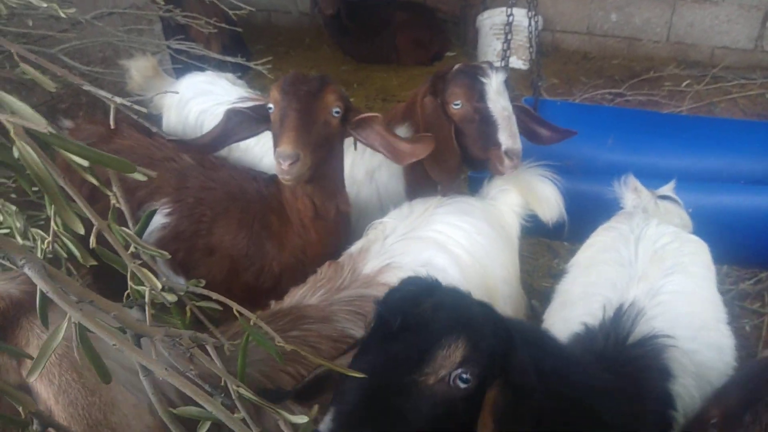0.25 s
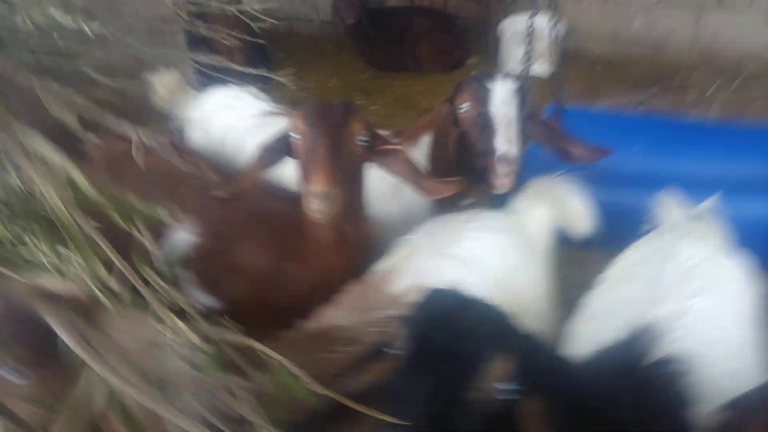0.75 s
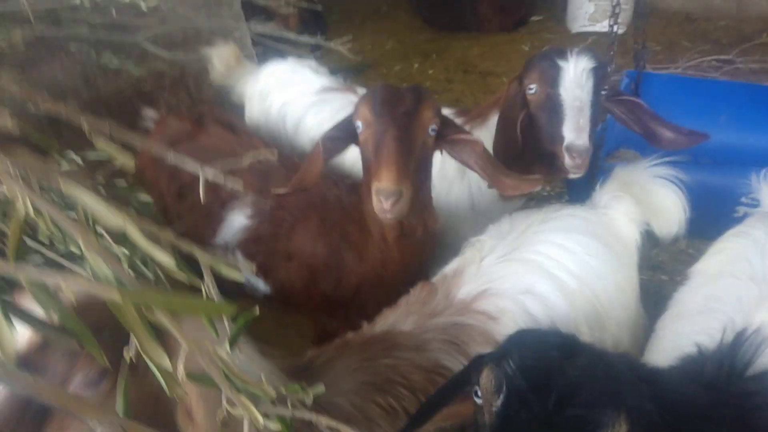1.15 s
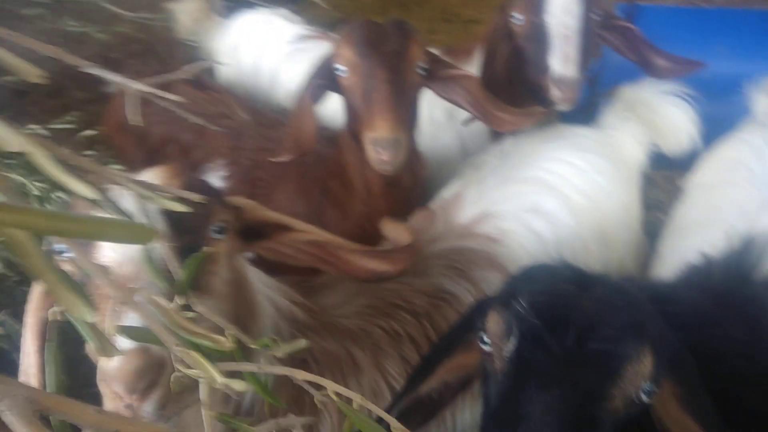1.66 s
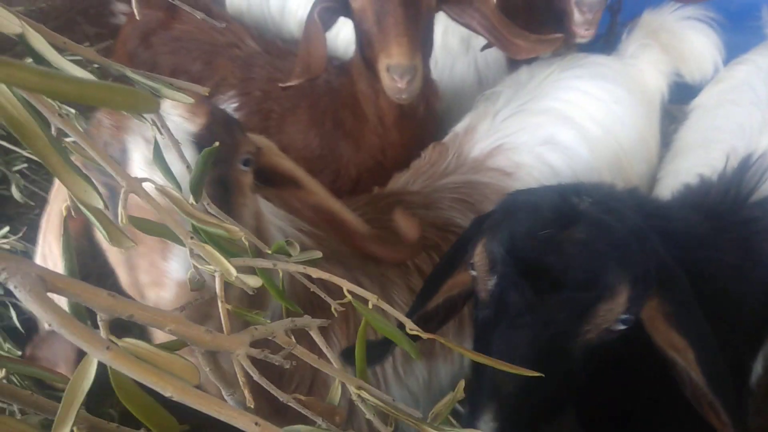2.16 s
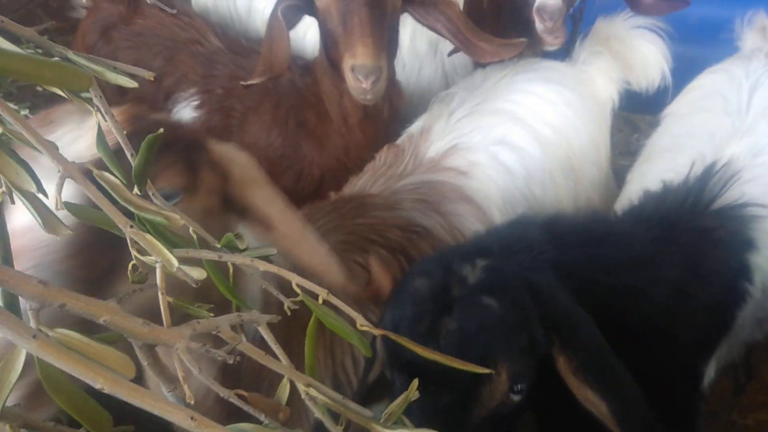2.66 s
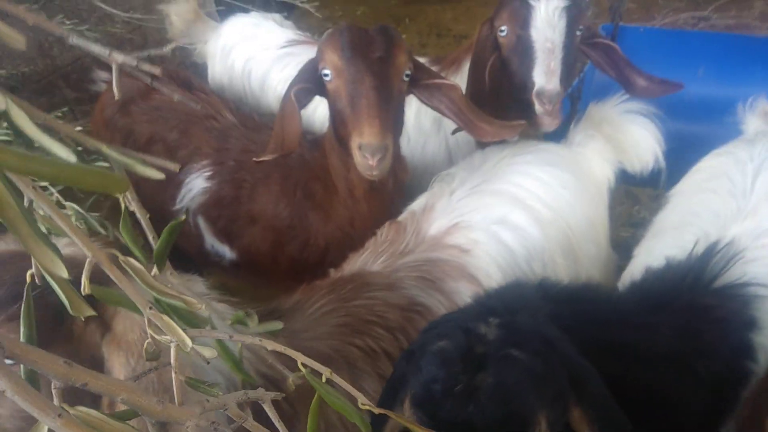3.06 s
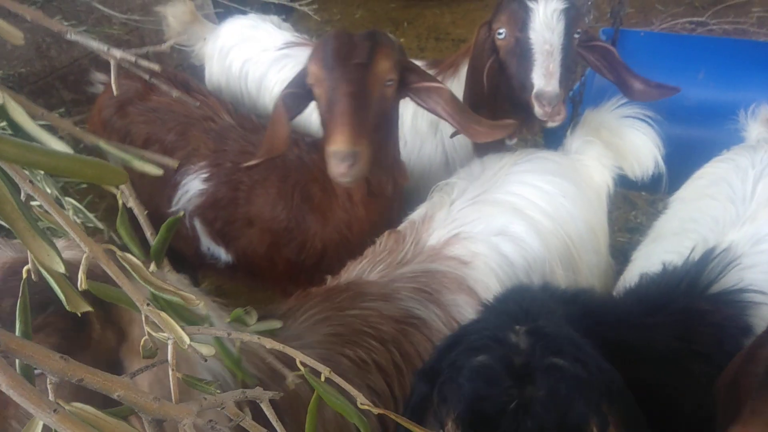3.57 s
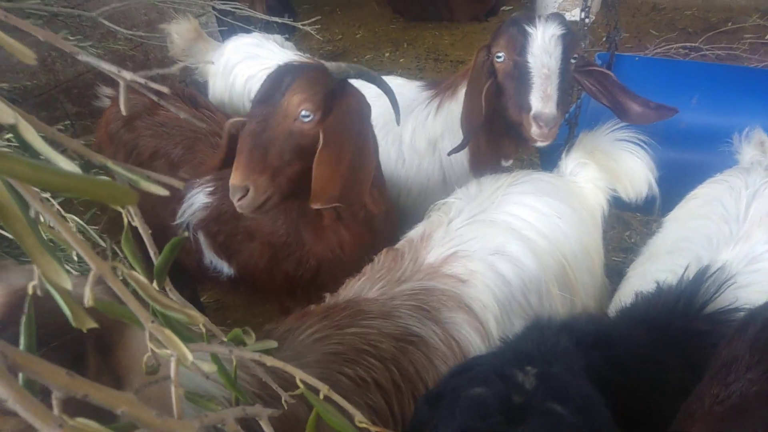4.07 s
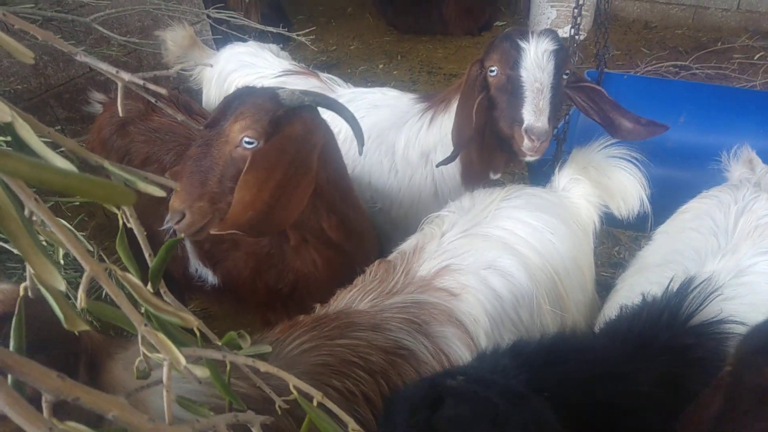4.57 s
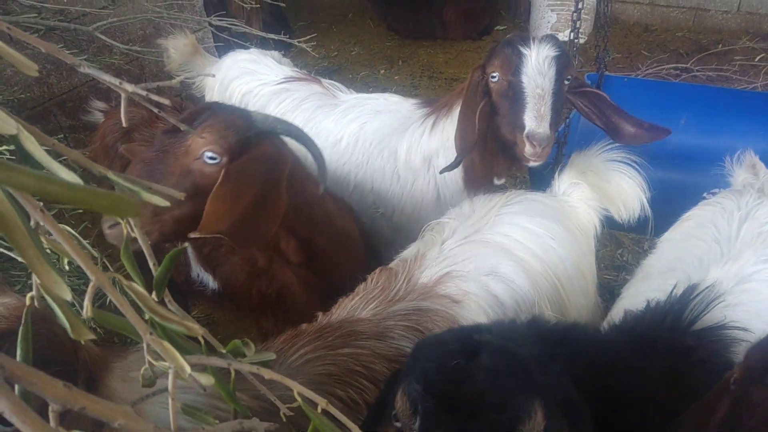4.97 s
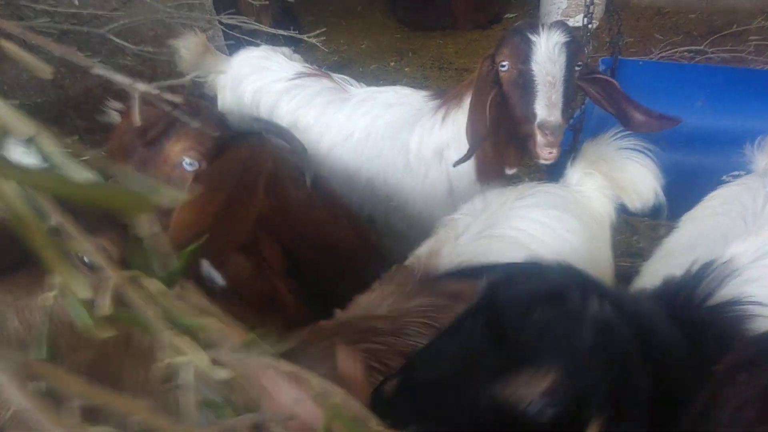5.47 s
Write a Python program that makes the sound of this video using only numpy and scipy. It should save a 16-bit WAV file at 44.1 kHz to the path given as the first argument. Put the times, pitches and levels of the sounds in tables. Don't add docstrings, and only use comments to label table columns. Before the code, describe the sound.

Goats browse on leafy branches right beside a hand-held phone in an open pen; the sound is dry, close and bright over very faint hiss and soft handling rumble. Small wooden knocks at 0.2 s lead into sharp twig clicks and a tiny squeak at 0.3-0.5 s, then leaves drag and snap at 0.7-0.95 s. Isolated snaps with short leaf showers follow at 1.4, 1.5 and 1.75 s. From 2.2 to 2.4 s jaws grind dully with low thuds; a firmer bite cracks at 2.8 s. Sparse tugs continue at 3.0, 3.4 and 3.8 s, and a heavy low thud and grind falls at 4.0 s. Snaps resume at 4.2 s, a strong one at 4.57 s, then dense rustling to 4.9 s. From 5.06 s breaks quicken, a stalk squeaks, and the loudest crunching cracks burst at 5.3-5.45 s, rustle fading by 5.7 s. Leaf treble leans left.

```python
import sys
import numpy as np
from scipy import signal
from scipy.fft import rfft, irfft
from scipy.io import wavfile
from scipy.ndimage import uniform_filter1d

SR = 44100
rng = np.random.default_rng(int(sys.argv[2]) if len(sys.argv) > 2 else 0)


def bounce(signal):
    frames = np.transpose(np.atleast_2d(signal))
    limited = np.clip(frames, -1, 1)
    pcm = np.round(limited * 32767).astype(np.int16)
    wavfile.write(sys.argv[1], SR, pcm)


def voltage_ratio(decibels):
    exponent = np.asarray(decibels, float) / 20
    return 10 ** exponent


N = 253134
TIME = np.arange(N) / SR
FREQ = np.fft.rfftfreq(N, 1 / SR)
PORT_LAG = -17

EDGES_HZ = (2720, 4900, 7700, 9700, 12100, 15850)
# t/s, treble loss/dB
SHADOW = [(0, 13.5), (1.1, 47), (1.5, 32), (4.3, 30), (4.42, 11.5), (4.8, 19.5), (5.2, 13.5), (5.74, 16)]


def band(x, lo_hz, hi_hz, order=200):
    f = np.clip(FREQ, lo_hz / 8, hi_hz * 8)
    low_cut = 1 + (lo_hz / f) ** order
    high_cut = 1 + (f / hi_hz) ** order
    return irfft(rfft(x) / np.sqrt(low_cut * high_cut), N)


def unit(x):
    return x / np.sqrt(np.mean(x ** 2))


def walk(rate_hz):
    k = int(SR / rate_hz)
    steps = np.repeat(rng.standard_normal(N // k + 1), k)
    return 1.2 * uniform_filter1d(uniform_filter1d(steps, k), k)[:N]


def crackle(rate_hz, spread_db, tail_s, bed):
    size_db = spread_db * np.minimum(rng.exponential(size=N), 4)
    breaks = (rng.random(N) < rate_hz / SR) * voltage_ratio(2 * size_db)
    power = signal.lfilter([1], [1, -np.exp(-1 / (tail_s * SR))], breaks)
    return unit(rng.standard_normal(N) * np.sqrt(bed + power / power.mean()))


def ports(x, other, pan_db, alike, lag):
    alike = np.clip(alike, 0, 1)
    right = np.sqrt(1 - alike ** 2) * other - alike * np.roll(x, lag)
    return np.array([x * voltage_ratio(pan_db / 2), right * voltage_ratio(-pan_db / 2)])


def swells(s, length, db, rise_s, fade_db=0):
    t = np.arange(0, N / SR, .001)[:, None] - s
    length = np.maximum(length, .01)
    rise = 20 * np.maximum(-t, 0) / rise_s
    sag = (15 + fade_db) * np.maximum(t, 0) / length
    release = 20 * np.maximum(t - length, 0) / 0.04
    return voltage_ratio(2 * (db - rise - release - sag))


def total(power, rest_db):
    level = 10 * np.log10(power.sum(axis=1) + voltage_ratio(2 * rest_db))
    return np.interp(TIME * 1000, np.arange(len(power)), level)


def floor():
    # f/Hz, density/dB
    hiss = [(18, 5), (35, -8), (75, 10.5), (210, -11), (584, -1.5), (780, -13.5), (2900, -6.5),
            (15500, -10)]
    hz, db = np.transpose(hiss)
    shape = voltage_ratio(np.interp(np.log(FREQ + 1), np.log(hz), db)) * (FREQ < EDGES_HZ[-1])
    a, b = rfft(rng.standard_normal((2, N))) * shape
    alike = np.clip(0.7 / (1 + (FREQ / 900) ** 2), 0, 1)
    pair = irfft(np.array([a, np.sqrt(1 - alike ** 2) * b - alike * a]), N)
    return unit(pair) * voltage_ratio(-67.5 + walk(6.3))


def hand():
    # t/s, length/s, rumble level/dB
    lurches = [(0.06, 0.08, -69), (0.35, 0.096, -71), (0.527, 0.099, -62.5), (0.905, 0.13, -65.5),
               (0.981, 0.1, -62.5), (1.212, 0.081, -67.5), (1.561, 0.17, -63), (1.677, 0.092, -60.5),
               (1.97, 0.074, -63.5), (2.216, 0.075, -65), (2.309, 0.056, -61), (2.724, 0.19, -69.5),
               (2.821, 0.082, -57.5), (3.016, 0.17, -71), (3.21, 0.17, -64), (3.623, 0.13, -71),
               (4.008, 0.14, -55), (4.19, 0.13, -64.5), (4.619, 0.045, -58.5), (4.671, 0.027, -59.5),
               (4.923, 0.21, -72.5), (5.15, 0.054, -59.5), (5.535, 0.29, -75.5)]
    s, length, db = np.transpose(lurches)
    level = total(swells(s, length, db, rise_s=0.62 * length), rest_db=-83)
    one, two = (unit(band(rng.standard_normal(N), 42, 125, order=8)) for _ in range(2))
    return ports(one, two, 1.2, alike=.62, lag=12) * voltage_ratio(level + 5.0 + 2.5 * walk(18))


def knocks():
    # t/s, peak level/dB, f/Hz
    thuds = [(0.151, -73.5, 380), (0.182, -56.5, 505), (0.223, -54.5, 505), (0.236, -59.5, 291),
             (0.608, -52.5, 306), (0.878, -62, 250), (0.976, -57, 206), (1.167, -56, 458.4),
             (1.211, -61, 194), (1.598, -53, 794), (1.609, -54, 383), (1.621, -58.5, 910),
             (2.028, -58.5, 184), (2.103, -58.5, 244), (2.218, -51, 437), (2.256, -60, 431),
             (2.262, -45, 399), (2.292, -51, 258), (2.305, -62, 197.9), (2.343, -58, 570.6),
             (2.663, -66, 557.4), (2.404, -60, 361.4), (2.821, -45.5, 395), (3.228, -49.5, 475),
             (3.661, -45.5, 1731), (3.702, -56.5, 568), (3.987, -45, 163.6), (4.004, -50, 160),
             (4.024, -42.5, 477.4), (4.031, -49, 252.5), (4.352, -55.5, 480), (4.829, -59, 304.1),
             (4.899, -56, 240.6), (5.019, -56.5, 214.4), (5.138, -57, 162)]
    out, t = np.zeros(N + 4096), np.arange(4096) / SR
    for s, db, hz in thuds:
        attack = 1 - np.exp(-t / 0.00034)
        decay = np.exp(-t * hz / 5.3) * attack * (1 - t / t[-1])
        tone = np.sin(2 * np.pi * hz * t) + 0.36 * np.sin(2 * np.pi * 0.453 * hz * t)
        i = int(s * SR)
        out[i:i + 4096] += voltage_ratio(db + 9.5) * decay * tone
    return ports(out[:N], 0, 4.5, alike=.95, lag=5)


def jaws():
    # t/s, length/s, grind level/dB, mouth resonance f/Hz, crunch relative level/dB
    chews = [(.16, 0.11, -67, 540, -3.5), (0.249, 0.032, -64, 303.4, -12), (0.396, 0.13, -72.5, 340, 4),
             (0.61, 0.11, -69, 305, -7), (0.88, 0.14, -72, 299, 6), (0.977, 0.077, -64, 274.5, 0),
             (1.186, 0.11, -66.5, 355.7, -11), (1.602, 0.064, -62, 437, 0.5),
             (2.013, 0.084, -63.5, 315.1, -6), (2.226, 0.14, -60, 483.5, -35),
             (2.286, 0.13, -62, 299.4, -37), (2.35, 0.11, -62, 433, -18), (2.822, 0.04, -57, 362.6, 6),
             (3.215, 0.082, -61, 342.7, -7), (3.363, 0.087, -72.5, 486, -21),
             (3.637, 0.11, -67.5, 380, -2.5), (3.719, 0.035, -70.5, 596.6, 2),
             (3.899, .05, -70.5, 379, -12), (3.955, 0.12, -57, 424, -11), (4.008, 0.11, -57.5, 518, -27),
             (4.36, 0.054, -71.5, 528, -26), (4.917, 0.17, -72, 240, -2), (5.048, 0.086, -70.5, 226.8, -15),
             (5.159, .1, -73, 206, -4), (5.307, 0.093, -62, 323.6, -10), (5.398, 0.11, -67, 604, 25.5)]
    # t/s, length/s, crunch level/dB
    crunches = [(0.773, 0.31, -66.5), (1.411, 0.034, -65.5), (2.403, 0.023, -57.5), (2.426, 0.062, -69.5),
                (2.645, 0.048, -87), (0.54, .08, -69.5), (3.518, 0.049, -80), (3.956, 0.14, -59.5),
                (4.016, 0.047, -60), (4.211, 0.21, -68), (4.535, 0.99, -73), (4.803, 0.069, -57.5),
                (5.137, 0.37, -67.5), (5.31, 0.22, -52.5), (5.365, 0.28, -57.5), (5.459, 0.06, -43)]
    rise, rest_db, rest_hz = 0.2, -82, 280.2

    s, length, db, hz, crunch = np.transpose(chews)
    strokes = swells(s, length, db, rise * length)
    grind = total(strokes, rest_db)
    hz = rest_hz * voltage_ratio(2 * (total(strokes * hz / rest_hz, rest_db) - grind))

    at, lasts, crush = np.transpose(crunches)
    crushes = swells(at, lasts, crush, rise * lasts)
    crunch = total(np.hstack([strokes * voltage_ratio(2 * crunch), crushes]), rest_db=-78)

    body, grit = [], []
    for _ in range(2):
        slips = crackle(80, spread_db=3.0, tail_s=0.0065, bed=0.18)
        ring = unit(band(slips, 0.057, 92, order=4)) * np.sin(2 * np.pi * np.cumsum(hz) / SR)
        body.append(unit(ring) + 1.1 * unit(band(slips, 130, 740, order=10)))
        crumbs = crackle(400, spread_db=3.5, tail_s=0.0031, bed=0.26)
        grit.append(unit(band(crumbs, 670, 2670, order=10)))
    grinding = ports(*body, 4.64, alike=0.68, lag=8) * voltage_ratio(grind + 5.5)
    crunching = ports(*grit, 0.65, alike=0.32, lag=PORT_LAG) * voltage_ratio(crunch + 3.0)
    return grinding + crunching


def bites():
    # t/s, peak level/dB, f/Hz
    cracks = [(0.343, -54.5, 660), (0.427, -58, 750), (2.403, -52, 1064), (2.642, -55.5, 2270),
              (2.824, -37.5, 1100), (2.839, -39, 787.5), (3.592, -57.5, 2040), (3.674, -56, 1820),
              (4.569, -50, 1880), (4.806, -55, 1256), (4.899, -52.5, 1116), (5.082, -54, 2046),
              (5.14, -47, 2090), (5.291, -44.5, 1930), (5.298, -42, 1823), (5.333, -32, 1076),
              (5.374, -26.5, 1630), (5.399, -46, 1864), (5.408, -55, 1530), (5.433, -29, 1636),
              (5.444, -48, 1193), (5.458, -55, 1130), (5.56, -44.5, 2040)]
    decay_s, width = 0.0098, 0.63
    out, t = np.zeros((2, N + 2048)), np.arange(2048) / SR
    f = np.fft.rfftfreq(2048, 1 / SR) + 1
    for (s, db, hz), noise in zip(cracks, rng.standard_normal((len(cracks), 2, 2048))):
        colour = (f > 420) * (f < 2350) / (1 + ((f / hz - hz / f) / width) ** 2)
        burst = np.roll(noise * np.exp(-t / decay_s), 64, axis=1)
        puff = irfft(rfft(burst) * colour, 2048)
        i = int(s * SR) - 64
        out[:, i:i + 2048] += puff / np.abs(puff[0]).max() * voltage_ratio(db - 0.5)
    return ports(*out[:, :N], 0.11, alike=0.17, lag=PORT_LAG)


def scrapes():
    # t/s, length/s, start f/Hz, end f/Hz, level/dB
    squeaks = [
        (0.384, 0.016, 3040, 2890, -41.5),
        (0.392, 0.035, 3200, 2890, -56),
        (5.106, 0.0419, 3450, 3780, -53),
        (5.148, 0.039, 3740, 3270, -47),
    ]
    out = np.zeros(N)
    rough = unit(band(rng.standard_normal(N), 10.0, 190, order=4))
    for s, length, hz0, hz1, db in squeaks:
        u = np.clip((TIME - s) / length, 0, 1)
        phase = 2 * np.pi * np.cumsum(hz0 + (hz1 - hz0) * u) / SR
        out += voltage_ratio(db) * np.sin(np.pi * u) * rough * np.sin(phase)
    return ports(out, 0, 0, alike=0.72, lag=PORT_LAG)


def snaps():
    # t/s, peak level/dB, f/Hz, top band relative level/dB
    twigs = [(0.327, -34.5, 8900, -4), (0.3398, -23.5, 7760, 3.5), (0.353, -45, 6100, -15),
             (0.373, -39, 8800, -8), (0.448, -36, 8050, -12), (0.6865, -42, 5280, -8.5),
             (0.7102, -33, 9270, 4), (0.3993, -31.5, 9400, 9), (0.4301, -37.5, 9500, -12),
             (0.48, -35, 8700, -25), (0.757, -27, 6800, -16), (0.764, -28.5, 5600, -23),
             (0.7992, -31, 9390, 7.5), (0.88, -30.5, 9000, -3), (1.7532, -31, 7900, 2),
             (1.7743, -25.5, 7200, -19), (2.209, -34.5, 5940, -7), (2.259, -29, 9200, 0),
             (2.5907, -25, 6300, -21), (2.9688, -39.5, 5210, -31), (3.0053, -30.5, 6230, -14),
             (3.0195, -35, 8500, 14), (3.403, -33.5, 7900, -24), (3.591, -48.5, 5930, -28),
             (3.7896, -33.5, 6700, 3), (3.8017, -32.5, 5900, -31), (3.8777, -41, 6617, -17),
             (3.921, -50, 9800, 3.5), (4.007, -57, 9580, -5), (4.177, -28, 8270, 4),
             (4.1859, -32, 8110, -18), (4.2002, -28.5, 6150, -19), (4.485, -29, 7100, -18),
             (4.654, -35, 6910, -6), (4.6688, -36, 5180, -17), (4.6906, -26, 7410, -7),
             (4.724, -32, 6840, -12), (4.7705, -31.5, 8960, -11), (4.7879, -27.5, 8740, 1),
             (4.8062, -25, 8000, -14), (4.8174, -23.5, 8000, -3), (4.895, -35, 9670, -3),
             (4.908, -39, 9500, -2), (5.018, -46.5, 7170, 9), (5.0622, -35, 7620, 1), (5.244, -27, 7340, 8),
             (5.289, -24, 7270, 4), (5.1462, -27.5, 9920, 3), (5.155, -32, 8000, 0),
             (5.4982, -25, 7760, -4)]
    # t/s, peak level/dB, f/Hz, top band relative level/dB, 2.5-5 kHz body relative level/dB
    stalks = [(0.3928, -38, 6050, 7, -8), (1.4057, -32.5, 6800, -29, -18.5),
              (1.5009, -24, 7170, -2.5, -11.5), (2.5536, -43, 7100, -6, -27),
              (2.6219, -30, 5530, -31, -11.5), (2.646, -34, 7810, -20, -8), (2.8245, -36, 5597, -7, 7.5),
              (3.485, -44, 5357, -25, -17), (4.4271, -28.5, 7790, -2, -14), (4.5685, -19, 7220, -3, -7),
              (4.572, -22, 6530, -15, -5.5), (4.8025, -28, 8040, -18, -8), (5.0826, -17.5, 8800, 2.5, -35),
              (5.1495, -25.5, 8420, 4, -19), (5.1991, -35, 6540, -17, -8), (5.2165, -33, 7794, -10, -3),
              (5.359, -27, 7920, -1, 0), (5.404, -29.5, 7000, 9, 9.5), (5.3265, -29, 5760, -15, 6.5),
              (5.3338, -14.5, 7300, -1, -5.5), (5.3385, -22, 7000, 3.5, -16),
              (5.3739, -14.5, 9500, 2.5, -6.5), (5.3752, -23.5, 5200, 2, -3), (5.379, -26, 9120, 6, -2.5),
              (5.3805, -27.5, 7005, -14, 9.5), (5.4343, -18.5, 6820, -3, -7), (5.4353, -17, 8000, -2, -2),
              (5.084, -25.5, 7060, -7, -17), (5.4375, -26, 7100, -3, -2), (5.6968, -33.5, 6294, -18, -4)]
    twig_body_db = -34
    breaks = [(*row, twig_body_db) for row in twigs] + list(stalks)
    out, t = np.zeros((2, N + 2048)), np.arange(2048) / SR
    f = np.fft.rfftfreq(2048, 1 / SR) + 1
    zone = np.searchsorted([700, *EDGES_HZ[:2], EDGES_HZ[3], 16600], f)
    ringing = zone == 3
    share = np.interp(f, [4500, 6000, 9000], [.05, .4, .95])
    lead = np.exp(2j * np.pi * f * -PORT_LAG / SR)
    for (s, db, hz, top, mid), noise in zip(breaks, rng.standard_normal((len(breaks), 2, 2048))):
        click = 2.5 * (t == 0) + noise * np.exp(-t / .0004)
        splinters = 0.21 * noise * np.exp(-t / 0.0075)
        burst = rfft(np.roll(click + splinters, 64, axis=1))
        colour = voltage_ratio(np.array([-90, mid - 16.5, mid + 0.26, -9.0, top - 5.0, -90])[zone])
        colour = colour + ringing / (1 + ((f / hz - hz / f) / 0.23) ** 2)
        burst[1] = 1.28 * burst[1] - 0.063 * burst[0] * lead
        burst[1] *= voltage_ratio(-share * np.interp(s, *np.transpose(SHADOW)))
        peak = np.abs(irfft(burst[0] * colour * ringing, 2048)).max()
        i = int((s + 0.001) * SR) - 64
        out[:, i:i + 2048] += irfft(burst * colour, 2048) / peak * voltage_ratio(db)
    return out[:, :N]


def leaves():
    # t/s, length/s, 5-10 kHz level/dB, top band and 2.5-5 kHz relative level/dB
    tugs = [(.341, 0.17, -59.5, 4, -15), (1.408, 0.074, -53, -3, -27), (1.503, 0.09, -55.5, 3.5, -6.5),
            (1.758, 0.1, -57, 0.5, -38), (2.212, 0.04, -50.5, -3, -38), (2.262, 0.048, -63, 5.5, -27),
            (2.593, 0.087, -63, -1.5, -29), (2.827, 0.038, -55, -1, 1), (2.86, 0.08, -65.5, -10, -4.5),
            (3.021, 0.012, -56, 3, -8), (3.03, 0.011, -54.5, -2, -3), (2.971, 0.054, -81, -19, -17),
            (3.007, 0.092, -64, 9, -20), (3.405, 0.11, -59.5, -0.5, -12.5), (3.792, 0.079, -54.5, -2, -13),
            (4.174, 0.021, -53, 2, -15), (4.186, 0.11, -48, -2.5, -10), (4.428, 0.072, -57, 2.5, -6.5),
            (4.573, 0.076, -49, 2, -3), (4.773, 0.05, -66, 17, -27), (5.064, 0.023, -62, 12, -23),
            (5.087, 0.019, -49, 6, -6), (5.1, 0.17, -53, 4, -7), (5.377, 0.0091, -39, 7.5, -2),
            (5.39, 0.16, -39.5, 1, -4.5), (5.405, 0.076, -42, -4, -3), (5.437, 0.055, -36, 1, -2),
            (5.698, 0.12, -57.5, -6, -8)]
    drags = [(.05, 0.088, -70.5, 0, 6), (.7, 0.04, -60, -6, -4.5), (.725, 0.25, -51.5, 1, -14),
             (.78, 0.13, -50.5, -7, -16), (.835, 0.082, -55, 5.5, -5), (.93, 0.16, -61, -18, -4),
             (1.22, 0.05, -70.5, 0, -4), (1.26, 0.59, -69.5, -3.5, 1), (2.086, 0.055, -70.5, 9, -5),
             (2.63, 0.045, -62, -14, -4), (2.655, .05, -56.5, -10, -5.5), (3.035, 0.064, -52.5, -4, -6.5),
             (3.22, 0.091, -67, -3, -7.5), (4.3, 0.082, -74, 15, 3.5), (4.5, 0.25, -56.5, 6, -10),
             (4.683, 0.14, -50.5, -3.5, -7.5), (4.807, 0.11, -45.5, 1, -7), (4.91, 0.079, -61.5, 10.5, 0),
             (5.025, 0.04, -68.5, 4.5, -2), (5.16, 0.14, -49.5, 3.5, -0.5), (5.22, 0.062, -50, -4, -2),
             (5.26, 0.044, -51, 3, -2.5), (5.3, 0.061, -43, 1, -2), (5.335, 0.051, -44.5, 6, -1.5),
             (5.47, 0.11, -39, 1.5, -2.5), (5.5, 0.13, -46.5, 2, -5.5), (5.57, 0.12, -54, 3, -5.5),
             (5.63, .04, -64.5, 5, 5)]
    s, length, db, top, low = np.transpose(list(tugs) + list(drags))
    rise_s = np.repeat([0.009, 0.043], [len(tugs), len(drags)])
    main = total(swells(s, length, db, rise_s), -100)
    top = total(swells(s, length, db + top, rise_s, fade_db=-1.5), -100) - main
    low = total(swells(s, length, db + low, rise_s), -100) - main

    shadow = np.interp(TIME, *np.transpose(SHADOW))
    near, far = (crackle(1500, spread_db=4.0, tail_s=0.0006, bed=1.0) for _ in range(2))
    shut = 3.3 * np.minimum(top + 1.2, 0)
    # level/dB, share of the shadow, lean to the left/dB
    layers = [(low + 1.1, .02, -1.2),
              (2.5, .42, -6.0),
              (1.5, .9, -1.1),
              (1.05 * top + 3, 1.1, -1.3),
              (top + shut + 1.6, 1.1, -1.4)]
    hollow = 11 * np.clip(-low / 8, 0, 1)
    out, shake = 0, 1.5 * walk(45)
    for lo, hi, (level, share, lean_db) in zip(EDGES_HZ, EDGES_HZ[1:], layers):
        flutter = shake + 1.2 * walk(45)
        pan = share * shadow + lean_db
        middle = (lo + hi) / 2
        end = hi - 380 * (hi == EDGES_HZ[1])
        for a, b in ((lo, middle), (middle, end)):
            lowest = a == EDGES_HZ[0]
            order = 12 if lowest else 200
            alike = 0.8 if lowest else 1100 / a
            pair = ports(unit(band(near, a, b, order)), unit(band(far, a, b, order)), pan, alike, PORT_LAG)
            patch = 1.3 * walk(14) - hollow * (lo < a < EDGES_HZ[1])
            out = out + pair * voltage_ratio(main + level - 3.0 - pan / 2 + flutter + patch)
    return band(out, 970, EDGES_HZ[-1])


def scene():
    return floor() + hand() + knocks() + jaws() + bites() + scrapes() + snaps() + leaves()


def thrift(x):
    # f/Hz, share
    keep_share = [(0, .2), (1000, .4), (1900, .85), (3400, 1.05), (9600, .8), (14000, .95), (15800, 1.1),
                  (15900, 99)]
    frame, grid, drowned_db = 1024, 287, -8

    n, k = np.arange(2 * frame)[:, None], np.arange(frame)
    window = signal.windows.kaiser_bessel_derived(2 * frame, 4 * np.pi)[:, None]
    cosines = np.cos(np.pi / frame * (n + .5 + frame / 2) * (k + .5))
    basis = window * cosines * np.sqrt(2 / frame)
    pad = 2 * frame - grid
    padded = np.pad(x, ((0, 0), (pad, 2 * frame - (N + pad) % frame)))
    blocks = padded.reshape(2, -1, frame)
    frames = np.concatenate([blocks[:, :-1], blocks[:, 1:]], axis=2)
    lines = frames @ basis
    power = lines ** 2

    near = uniform_filter1d(power, size=24, axis=2)
    masked = voltage_ratio(-6) * uniform_filter1d(power, size=60, axis=2)
    waver = uniform_filter1d(rng.standard_normal((1, lines.shape[1], frame // 8)), size=2, axis=1)
    share = np.interp(k * SR / 2 / frame, *np.transpose(keep_share))
    share = share * voltage_ratio(10.5 * np.repeat(waver, 8, axis=2))
    weak = power < share ** 2 * np.maximum(near, masked)

    small = power.reshape(2, -1, frame // 8, 8).sum(axis=(0, 3))
    above = sum(np.roll(small, -j, axis=1) for j in (2, 3, 4)) / 3
    weak |= np.repeat(small < voltage_ratio(2 * drowned_db) * above, 8, axis=1) & (k > 90)

    edge = (np.diff(frames, axis=2, prepend=0) ** 2).reshape(*lines.shape[:2], 8, -1).sum(axis=3)
    steady = (edge[..., 1:] < 9 * edge[..., :-1] + 1e-12).all(axis=(0, 2))[None]
    lines = np.where(weak & steady[..., None], 0, lines)

    mid, side = (lines[0] + lines[1]) / 2, (lines[0] - lines[1]) / 2
    excess = mid ** 2 - voltage_ratio(2 * drowned_db) * side ** 2
    faint = excess.reshape(-1, frame // 16, 16).sum(axis=2) < 0
    lines = lines - mid * np.repeat(faint & steady.T, 16, axis=1) * (k > 80)
    back = lines @ basis.T
    blocks[:, 1:-1] = back[:, 1:, :frame] + back[:, :-1, frame:]
    return blocks.reshape(2, -1)[:, pad:pad + N]


def band_limit(x):
    return signal.sosfilt(signal.butter(12, 16970, fs=SR, output="sos"), x)


def record(dry):
    mix = band(thrift(dry), 6.1, 15730)
    return band_limit(mix)


dry = scene()
out = record(dry)
bounce(out)
```